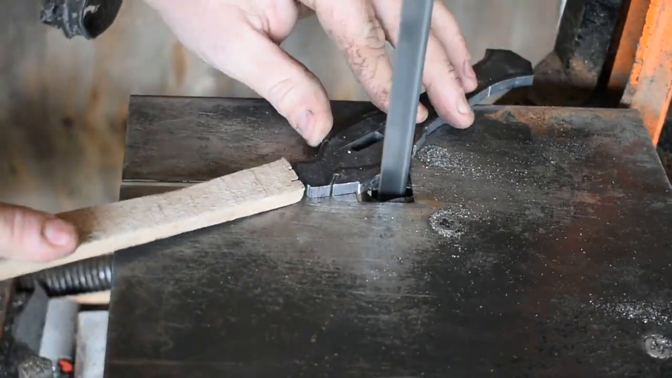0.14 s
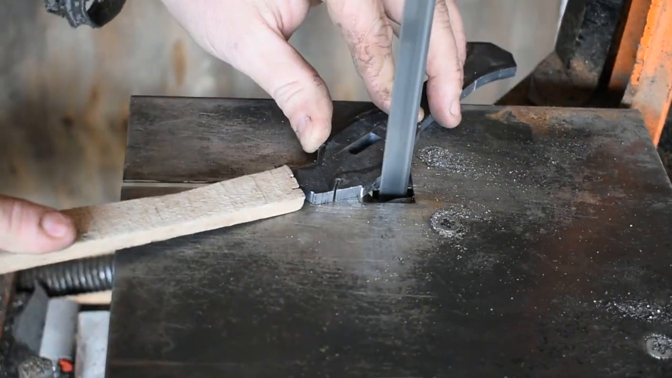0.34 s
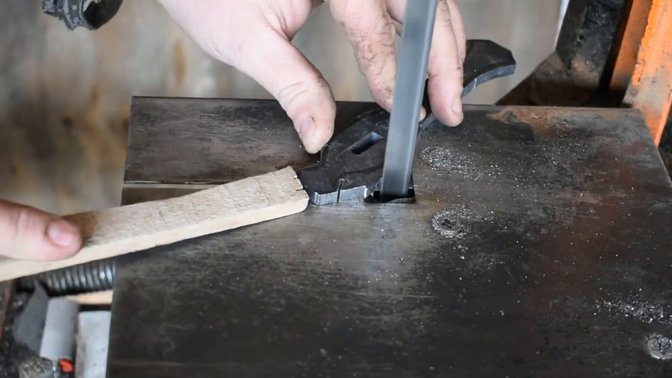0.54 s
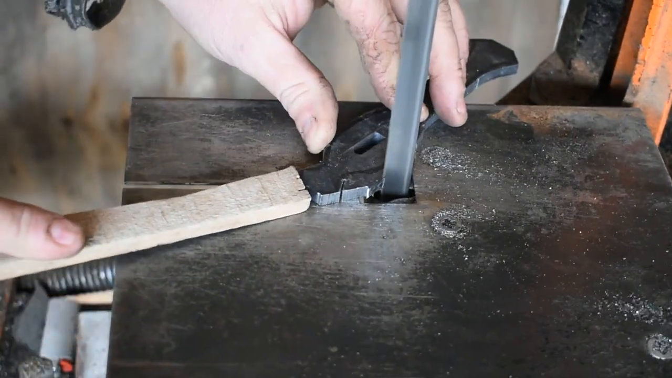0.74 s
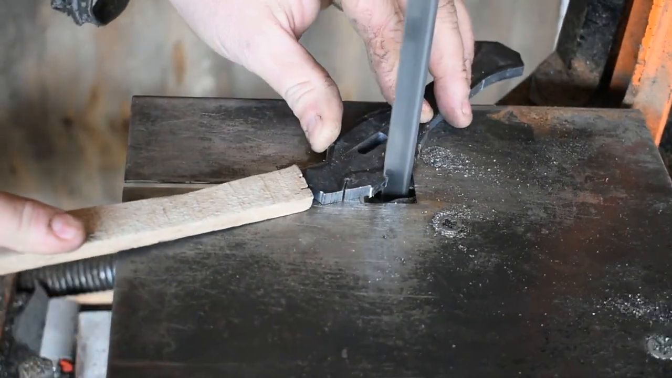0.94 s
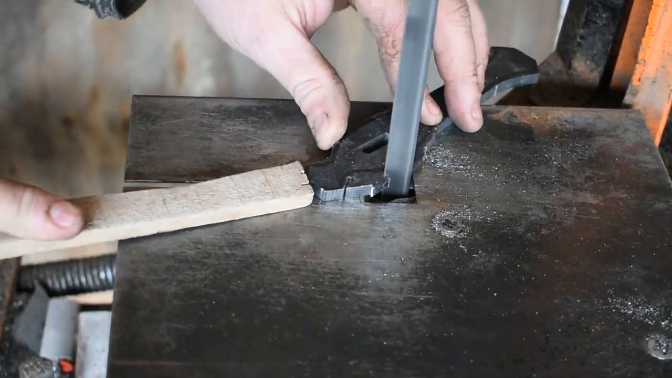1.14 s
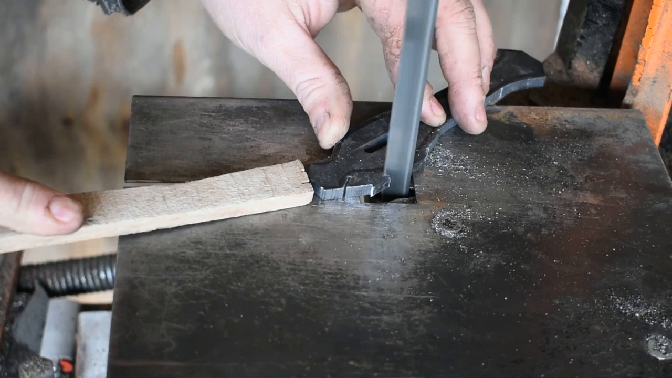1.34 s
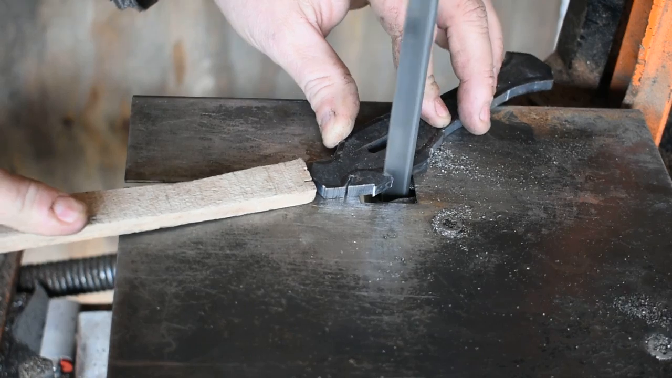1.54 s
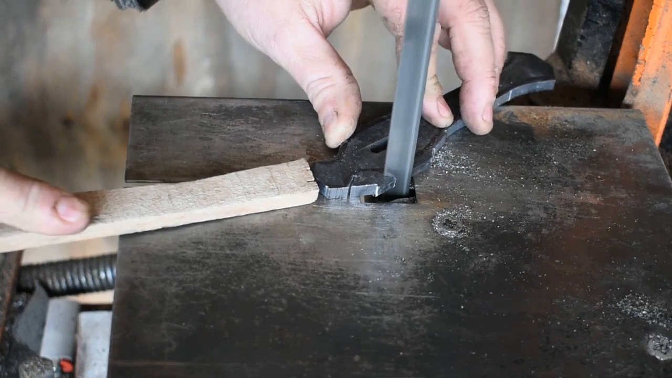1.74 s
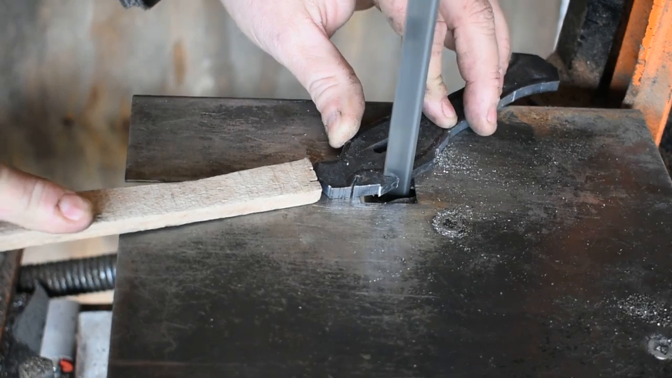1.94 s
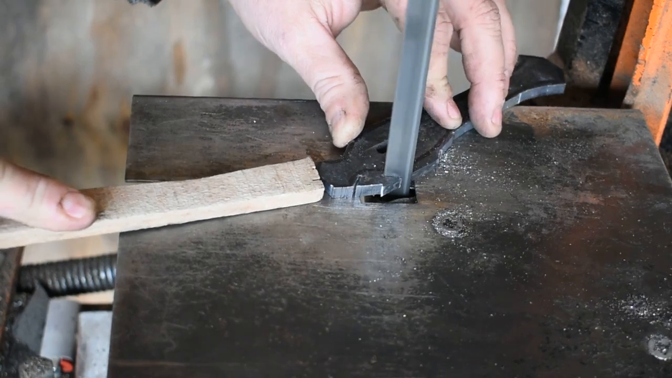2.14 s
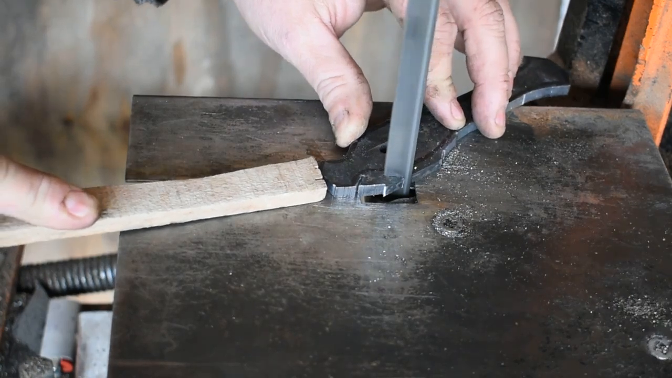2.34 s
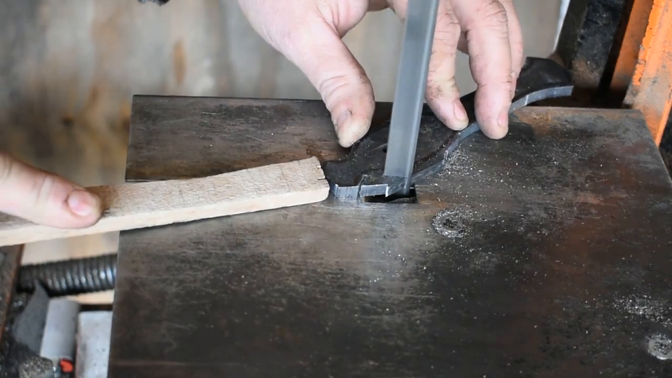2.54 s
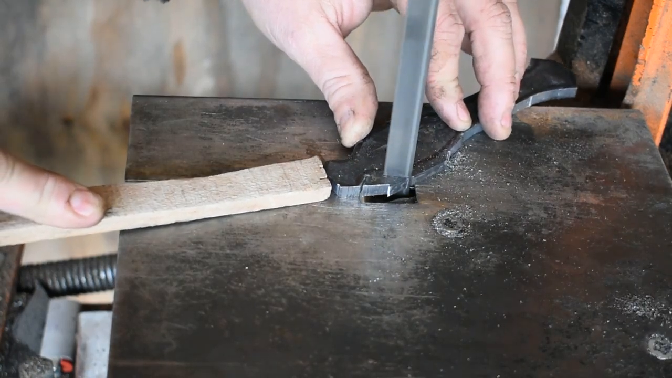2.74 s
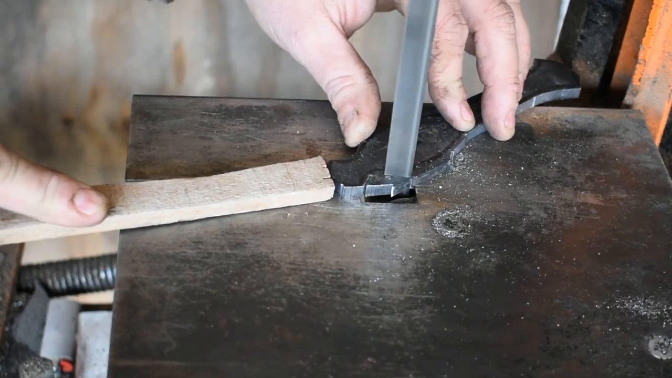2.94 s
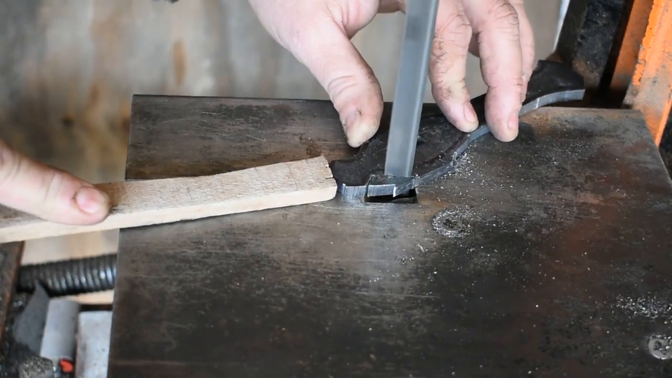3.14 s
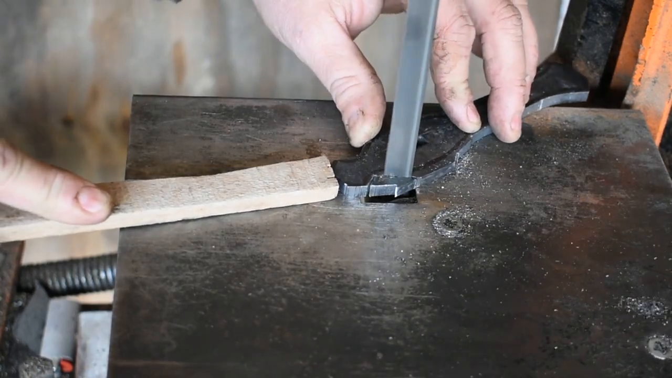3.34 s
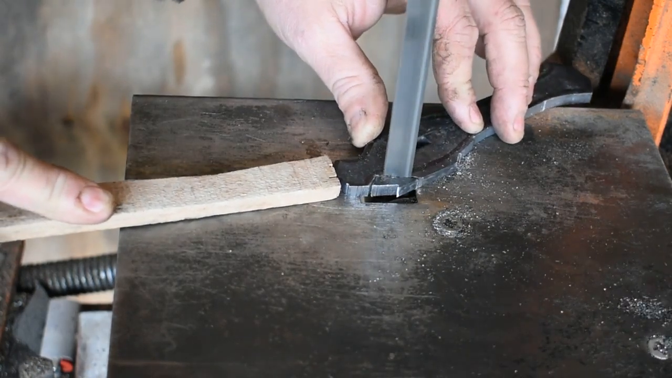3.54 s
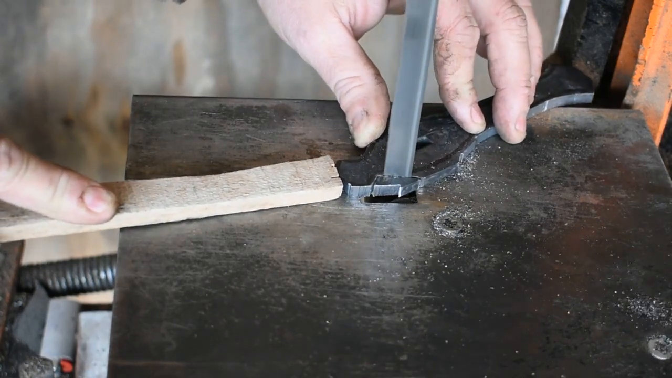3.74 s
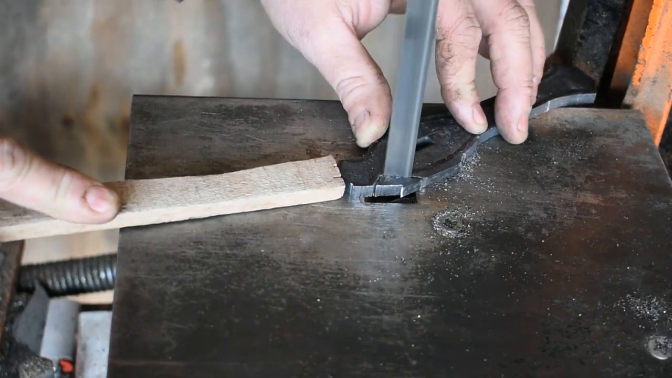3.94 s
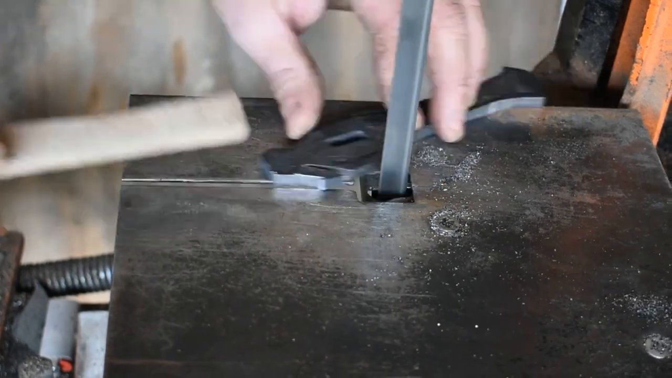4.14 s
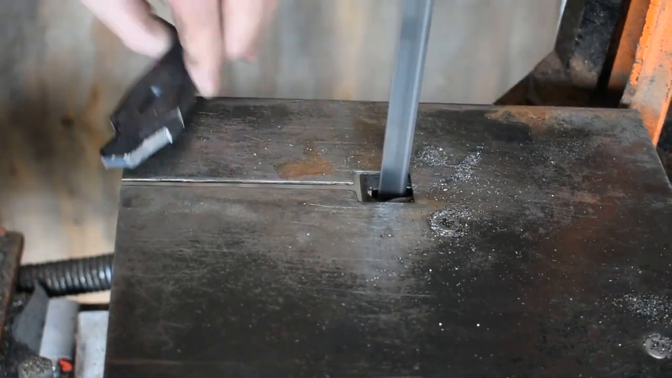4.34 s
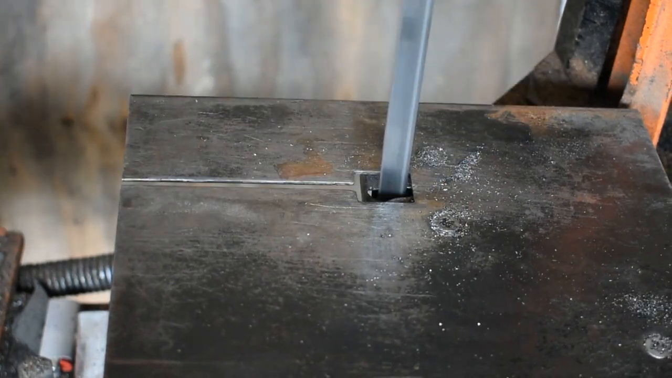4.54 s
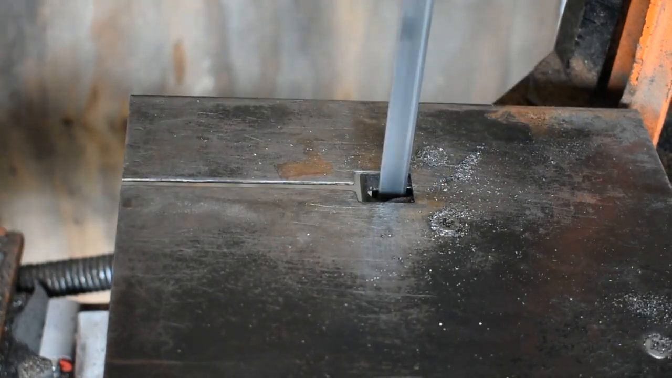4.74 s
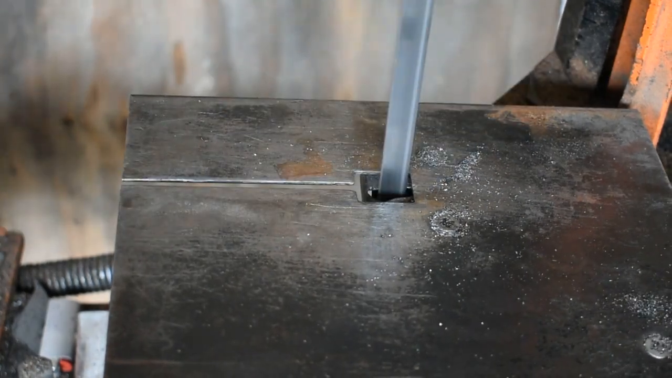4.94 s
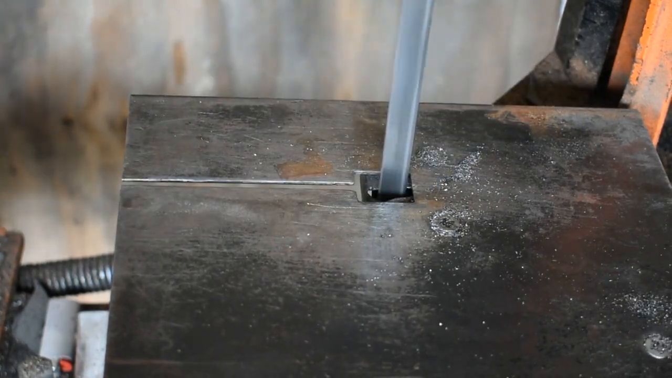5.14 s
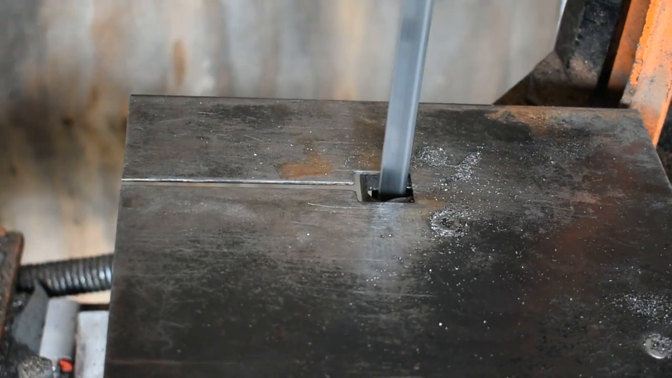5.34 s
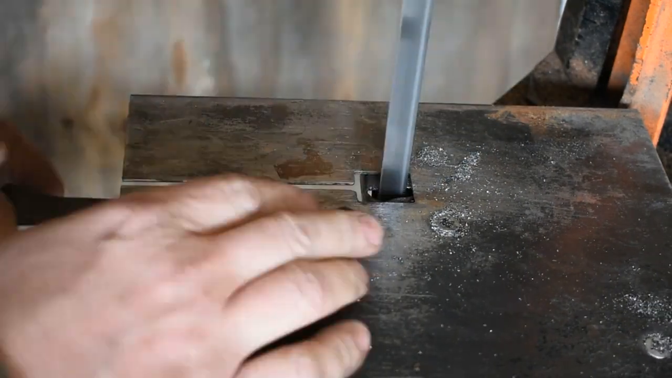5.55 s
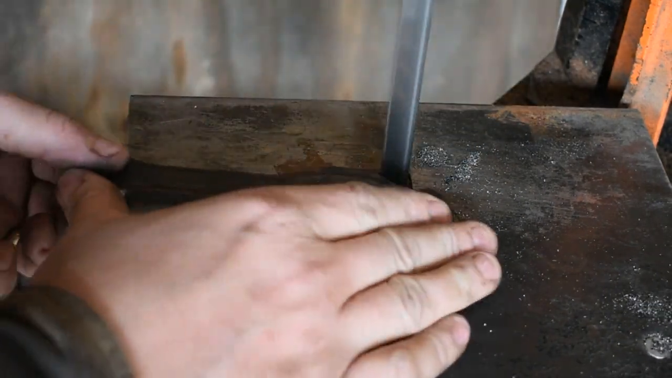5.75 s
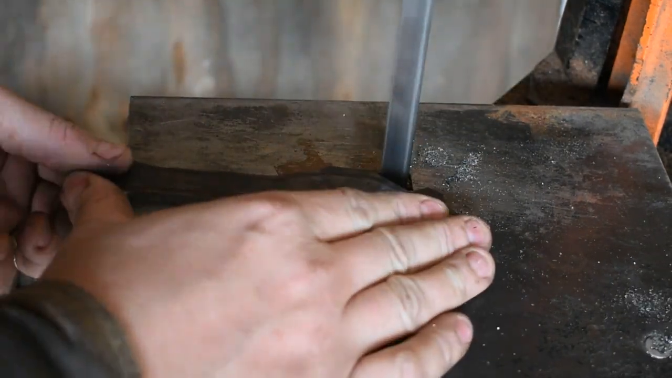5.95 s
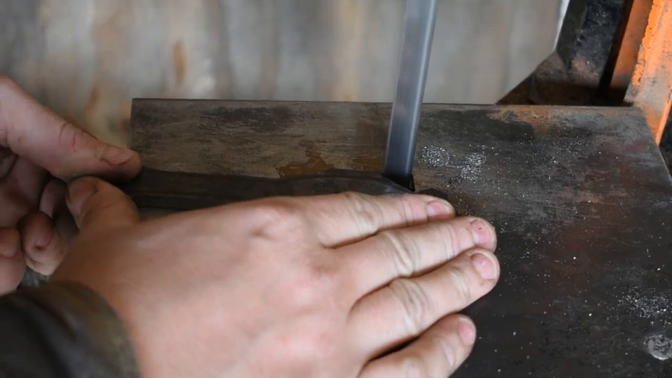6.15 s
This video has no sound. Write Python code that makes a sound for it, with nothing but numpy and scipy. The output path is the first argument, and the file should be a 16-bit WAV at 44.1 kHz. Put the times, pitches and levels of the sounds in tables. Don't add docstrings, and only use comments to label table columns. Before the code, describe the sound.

Dry, close mono sound, sped up and bright: saw teeth grind steel with a ringing rasp and two-toned squeal, briefly easing with every lap of the blade. Soft bumps come through the table. After four seconds the work knocks free and the saw idles with a steady whirr. Sharp metallic ticks and thuds follow, then rattling contact and a rougher second cut.

```python
import sys
import numpy as np
from scipy import signal
from scipy.fft import rfft, irfft
from scipy.io import wavfile
from scipy.ndimage import uniform_filter1d, minimum_filter1d

SR = 44100
rng = np.random.default_rng(int(sys.argv[2]) if len(sys.argv) > 2 else 0)


def store_pcm(level_fs):
    pcm = np.round(np.clip(level_fs, -1, 1) * 32767).astype(np.int16)
    wavfile.write(sys.argv[1], SR, np.atleast_2d(pcm).T)


def voltage_ratio(decibels):
    exponent = np.asarray(decibels, float) / 20
    return 10 ** exponent


N = 273420
T = np.arange(N) / SR
LAP_S = .4445
SQUEAL_HZ = 2038


def rms1(x):
    return x / np.sqrt(np.mean(np.abs(x) ** 2))


def curve(rows):
    s, *columns = np.transpose(rows)
    return [np.interp(T, s, c) for c in columns]


def walk(rate):
    steps = np.repeat(rng.standard_normal(int(N / SR * rate) + 2), 8)
    smooth = uniform_filter1d(uniform_filter1d(steps, size=8), size=8)
    return 1.3 * np.interp(T * rate * 8, np.arange(len(smooth)), smooth)


def humps(s, ms, height):
    grid = np.arange(0, N / SR, 1 / 1000)[:, None]
    shape = np.exp(-4 * np.log(2) * (1000 * (grid - s) / ms) ** 2)
    return np.interp(T, grid[:, 0], shape @ height)


def ring(x, hz, width, order=1):
    b, a = signal.iirpeak(hz, hz / width, SR)
    return signal.sosfilt([np.r_[b, a]] * order, x)


def waver(hz, width, steady):
    pole = [1, 1.5 * np.pi * width / SR - 1]
    flicker = signal.lfilter([1], np.convolve(pole, pole), rng.standard_normal((2, N)))
    flicker = steady + rms1(flicker[0] + 1j * flicker[1])
    turning = np.exp(2j * np.pi * np.cumsum(hz + 0 * T) / SR)
    return rms1(np.imag(flicker * turning))


def colour(x, points):
    hz, db = np.transpose(points)
    f = np.fft.rfftfreq(N, 1 / SR) + 1
    return irfft(rfft(x) * voltage_ratio(np.interp(np.log(f), np.log(hz), db, left=-120)), N)


def grit(spread_db, rate, flutter_db):
    size = np.minimum(rng.exponential(size=N // 16 + 1), 3)
    force_db = spread_db * np.repeat(size, 16)[:N] + flutter_db * walk(rate)
    return rms1(rng.standard_normal(N) * voltage_ratio(force_db))


def body(push, modes, spectrum, fill_db, wander_db, rate):
    rings = 0
    for f, w, db in modes:
        level = voltage_ratio(db + 1 - f / 3500 + wander_db * walk(rate))
        rings = rings + level * ring(push, f, (1.2 + f / 14000) * w, order=2)
    rings = signal.sosfilt(signal.butter(3, 600, "high", fs=SR, output="sos"), rings)
    sound = rings + voltage_ratio(fill_db) * colour(push * rng.choice([-1, 1], N), spectrum)
    return rms1(sound + signal.sosfiltfilt(signal.butter(5, 960, "high", fs=SR, output="sos"), sound))


# time in seconds, width in ms, change in dB.
LEVEL_SWINGS = [(.014, 22, 1), (.03, 12, -3), (.086, 14, -0.5), (.143, 14, 0.5), (.227, 10, -1.5),
                (.286, 8.9, 2), (.301, 14, -0.5), (.33, 23, 2.5), (.36, 16, -1), (.4, 24, 0.5), (.2, 30, 1.5),
                (.46, 13, 1), (.502, 12, -1), (.545, 14, -2), (.658, 14, -2.5), (.756, 16, -3), (.835, 12, -1),
                (.865, 28, 0), (.915, 8, -2.5), (.98, 14, -5), (1, 20, 3.5), (1.08, 13, -3.5), (1.16, 24, 0.5),
                (1.36, 30, 1), (1.426, 14, -2.5), (1.63, 15, 3), (1.868, 13, 1), (2.31, 18, -3),
                (2.515, 12, -2), (2.961, 14, 0.5), (3.411, 22, -4), (3.86, 28, -3.5), (3.9, 40, 0.5),
                (4.005, 8, -4), (4.085, 14, -5), (4.172, 19, -1), (4.33, 290, 2.5), (4.73, 30, 1),
                (4.907, 95, -2), (4.902, 23, -3.5), (5.438, 25, -6.5), (5.787, 11, 0), (5.85, 30, 5.5),
                (5.882, 13, -1.5), (5.905, 12, -3), (5.995, 26, 0), (6.009, 8, -1.5), (6.04, 45, 0),
                (6.17, 24, -2.5)]


def level_swings():
    return voltage_ratio(humps(*np.transpose(LEVEL_SWINGS)))


# first pass in seconds, width in ms, widening in ms per lap,
# dip in dB, shallower by dB per lap.
WORN = [
    (0.539, 22, 1.146, -1.5, 0),
    (0.743, 4.6, 3.7, -14.5, 3.5),
]
# start in seconds, end in seconds, level in dB.
CONTACT = [
    (-.1, 0.021, -26.5),
    (.14, 4.09, -27),
    (5.75, 5.84, -33),
    (5.79, 5.85, -29.5),
    (5.885, 6.4, -31.5),
    (5.95, 6.4, -32),
]


def bite():
    rise_s, release_s = 0.02, 0.11
    ramp = lambda s, length: np.clip(s / length, 0, 1) ** 2
    return sum(voltage_ratio(db) * ramp(T - a, rise_s) * ramp(b + release_s - T, release_s) for a, b, db in CONTACT)


def worn():
    lap = np.arange(9)
    dips = 0
    for s, ms, wider, db, fade in WORN:
        passes = s + LAP_S * lap
        depth = np.minimum(db + fade * lap, 0) * (passes < CONTACT[1][1])
        dips = dips + humps(passes, ms + wider * lap, depth)
    return dips


STAGE_S = [
    0,
    .55,
    2.15,
    5,
]
# frequency in Hz, width in Hz, level in dB.
ENTRY = [(1706, 71, -6), (2013, 49, 3.5), (3330, 88, 0), (3730, 290, -1.5), (4150, 75, -9), (4850, 170, 2),
         (5200, 53, -10), (5630, 63, -11), (6200, 170, -11), (7460, 96, -8), (8300, 69, -5),
         (9980, 120, -12.5), (10400, 95, -8), (11500, 43, -5), (11900, 62, -13), (13900, 70, -11),
         (14600, 65, -10), (15600, 55, -16)]
MIDDLE = [(1275, 26, -20.5), (1713, 65, -12), (2055, 27, -1), (2640, 150, -17.5), (2916, 32, -9.5),
          (3323, 120, -5.5), (4100, 190, 6.5), (4610, 69, -6), (4810, 31, -6), (5160, 72, -10),
          (5780, 72, -9), (5496, 38, -4), (5960, 136, -2.5), (6204, 130, -5.5), (6650, 72, -12),
          (6980, 80, -7.5), (7930, 150, -10), (9500, 41, -14), (10220, 280, -15.5), (11280, 380, -10.5),
          (11930, 27, -6), (12200, 43, -25.5), (12600, 79, -14), (13500, 60, -28), (13700, 170, -11.5),
          (15200, 280, -15)]
DEEP = [(1298, 7.5, -15.5), (1776, 53, -9.5), (2048, 33, -1), (2679, 150, -17.5), (2870, 16, -21),
        (3350, 60, -5), (3930, 270, -2.5), (4587, 115, -3.5), (4770, 166, -3.5), (5000, 28, -8.5),
        (5440, 54, -3.5), (6000, 390, -6), (6720, 87, -11), (6770, 31, -1), (7240, 120, -19),
        (7760, 180, -11), (8210, 260, -7), (9170, 52, -15.5), (10060, 90, -7.5), (11340, 84, -12.5),
        (11800, 65, -8.5), (13300, 650, -13.5), (15500, 240, -13)]
SECOND = [(1207, 160, -5.5), (1696, 63, -3.5), (2100, 38, -15), (3290, 210, -1.5), (3770, 150, -7),
          (4710, 160, 1), (4960, 180, -2.5), (5500, 130, -8.5), (6040, 260, -5), (7630, 160, -7.5),
          (8240, 160, -13), (10200, 320, -13), (10400, 200, -8), (12730, 200, -2.5), (13900, 240, -6.5),
          (14200, 38, -13), (15400, 120, -5)]
# frequency in Hz, level in dB per Hz.
ENTRY_TEAR = [(150, -61), (250, -29), (920, -14.5), (1400, -0.5), (1910, -40), (2080, -2.5), (2520, -4.5),
              (3390, 4), (4790, 4), (5610, -2), (11400, -4.5), (15900, -5)]
MIDDLE_TEAR = [(150, -69), (250, -51), (904, -28), (1260, -22), (1350, -61), (1720, -20), (1880, -41),
               (2010, -3.5), (2430, -26), (4030, 7), (4400, -11), (6110, -1.5), (8810, -8.5), (11400, -12),
               (15900, -32)]
DEEP_TEAR = [(150, -64), (250, -60), (815, -66), (1600, -13), (1750, -6.5), (1910, -27), (2080, 2.5),
             (2390, -10.5), (4030, 4), (4400, -12.5), (6110, 3), (8220, -2), (9120, -12.5), (9950, -4.5),
             (15900, -21)]
SECOND_TEAR = [(150, -65), (250, -30), (904, -36), (1240, -25), (1500, -34), (1720, -20), (2390, -9),
               (3270, -6), (4710, 0.5), (9120, -5.5), (12700, -6), (15900, -7)]


def cut():
    push = grit(spread_db=3.0, rate=110, flutter_db=0.91)
    stages = [(ENTRY, ENTRY_TEAR), (MIDDLE, MIDDLE_TEAR), (DEEP, DEEP_TEAR), (SECOND, SECOND_TEAR)]
    begun = [np.clip((T - s) / .4 + (.5 if s else 1), 0, 1) for s in STAGE_S] + [0]
    sound = 0
    for k, (modes, tear) in enumerate(stages):
        free = []
        for f, w, db in modes:
            near_squeal = abs(f / SQUEAL_HZ - round(f / SQUEAL_HZ)) < .07 and f < 4200
            free.append((f, w, db - 9 * near_squeal))
        share = np.sqrt(begun[k] - begun[k + 1])
        sound = sound + share * body(push, free, tear, fill_db=-12, wander_db=2.2, rate=16)
    first_piece = T < STAGE_S[3]
    web = np.clip((T - 3.16) / 0.39, 0, 1) * first_piece
    sound = sound + web * (0.94 * ring(sound, 15500, 2600) - 0.72 * ring(sound, 5900, 840))
    lost = .6 * (begun[1] - begun[3]) * np.clip(2.3 - T / 2, .4, 1)
    sound = sound - lost * ring(sound, 4030, 450)
    sound = sound - 0.5 * np.clip(T - 1.0, 0, 1) * (1 - begun[3]) * ring(sound, 2760, 790)
    through = np.clip((T - 3.5) / 0.054, 0, 1) * first_piece
    sound = sound + through * (0.97 * ring(sound, 5200, 620) - 0.34 * ring(sound, 6200, 1900))
    sound = sound * voltage_ratio(1 * begun[3] * walk(55))
    sound = sound - np.clip((T - 6.07) / 0.042, 0, 1) * ring(sound, 1130, 1400)
    return bite() * sound


# time in seconds, load from 0 to 1.
LOAD = [
    (.3, 0.15),
    (.62, 0.5),
    (4.05, 0.53),
    (4.25, 0.15),
    (5.78, 0.03),
    (5.86, 0),
    (6.1, 0.6),
]


def work_load():
    return curve(LOAD)[0]


# frequency in Hz, width in Hz, level in dB.
FRAME = [(662, 61, -15.5), (1256, 23, -6), (1538, 41, -5.5), (1780, 38, -3), (1854, 18, -6),
         (2170, 66, -18), (2628, 88, -7.5), (3104, 70, -2), (3600, 20, 0), (3776, 100, -5.5),
         (4110, 35, -16), (4740, 57, 0.5), (4830, 87, 1.5), (5180, 44, -9), (5460, 27, -23),
         (6270, 83, -9.5), (6830, 220, -9), (7080, 69, -8), (8223, 99, -7), (10000, 41, -22),
         (10060, 130, -13.5), (11080, 190, -7), (11470, 33, -7), (13100, 250, -9.5), (13900, 60, -2),
         (13900, 190, -11), (15600, 180, -44)]
# frequency in Hz, level in dB per Hz.
WHIRR = [(150, -60), (250, -27), (459, -57), (501, -15.5), (760, -18), (986, -7), (1520, -4.5),
         (2850, -15.5), (3160, -1.5), (4170, -9.5), (4710, -4.5), (5910, -12), (8220, -8.5), (14300, -17),
         (15900, -3.5)]
# multiple of the motor frequency, level in dB.
MOTOR_ORDERS = [(0.359, -15), (1, 1.5), (1.35, -1), (2, 11), (2.997, 13)]


def idle():
    motor_hz = 504.5
    push = grit(spread_db=1.5, rate=60, flutter_db=.7)
    whirr = body(push, FRAME, WHIRR, fill_db=-5.5, wander_db=2.4, rate=18)
    hum = sum(voltage_ratio(db) * waver(k * motor_hz, width=10 * k, steady=1.8 / k) for k, db in MOTOR_ORDERS)
    load = work_load()
    return whirr * voltage_ratio(-32 - 9.5 * load) + hum * voltage_ratio(-65.5 - 24 * load)


# time in seconds, peak in dB.
KNOCK = [(0.0991, -21.5), (0.117, -22.5), (1.165, -35), (2.991, -25), (4.1226, -19.5), (4.2535, -25),
         (4.633, -27), (4.735, -28), (4.876, -29), (5.2663, -23), (5.566, -14.5), (5.7673, -20),
         (5.795, -18), (5.803, -20), (5.895, -24.5), (5.917, -21), (5.931, -30), (5.987, -21), (6.019, -24),
         (6.035, -27), (6.06, -37), (6.1, -26)]
# frequency in Hz, width in Hz, level in dB.
PIECE = [(2420, 52, 2), (3700, 320, 8.5), (5330, 1100, -0.5), (6100, 180, -6), (7540, 1400, -3.5),
         (9970, 360, 2.5), (12600, 1300, -3)]
# time in seconds, level in dB.
THUD = [
    (4.1234, -40),
    (4.2554, -60),
    (4.7943, -35),
    (4.876, -42),
    (5.302, -39),
    (5.564, -38),
    (5.799, -52),
]


def knocks():
    t60_s = 0.047
    force, thud = np.zeros(N), np.zeros(N)
    for s, db in KNOCK:
        i = int(s * SR)
        after = T[:min(N - i, 4000)]
        decay = np.exp(-np.log(1000) * after / t60_s)
        force[i:i + len(after)] += voltage_ratio(db) * decay * np.minimum(after / .001, 1)
    for s, db in THUD:
        thud[int(s * SR)] += voltage_ratio(db)
    push = rng.standard_normal(N) * force
    rattle = sum(voltage_ratio(db) * ring(push, f, w) for f, w, db in PIECE)
    return voltage_ratio(1.5) * rattle + voltage_ratio(-46.0) * push + voltage_ratio(21.0) * ring(thud, 178, 540)


# time in seconds, low line in dB, high line in Hz, high line in dB.
SQUEAL = [(.14, -44, 3920, -48.5), (.37, -43, 4110, -34), (.48, -43, 4110, -34), (.57, -48, 4110, -27.5),
          (.75, -51, 4080, -29), (1.08, -42.5, 4110, -27), (1.3, -41, 4120, -30), (1.7, -39.5, 4070, -30),
          (2.2, -42, 4110, -31), (2.6, -36.5, 4155, -31), (2.85, -38, 4120, -37), (3.3, -38, 4120, -35),
          (3.55, -38.5, 4150, -36.5), (3.77, -40, 4150, -41.5), (3.95, -33, 4150, -37),
          (4.14, -42, 4150, -35.5)]
# time in seconds, low line in dB.
SQUEAL_AGAIN = [
    (5.95, -50),
    (6.08, -49),
    (6.2, -40),
]


def squeal():
    low_db, high_hz, high_db = curve(SQUEAL)
    break_db, break_ms = -15, 55
    first, second = WORN[0][0], WORN[1][0]
    lap = (T - second) / LAP_S % 1 - .5

    def near(s):
        away_s = (((T - s) / LAP_S + .5) % 1 - .5) * LAP_S
        return np.exp(-(away_s * 2000 / break_ms) ** 2)

    broken = break_db * (near(second) + .7 * np.clip(1.7 - T / 2, .15, 1) * near(first))
    low_db = low_db + 5.5 * lap + 0.77 * broken
    high_db = high_db + broken
    high_hz = high_hz + 19 * lap
    cutting = np.clip((T - SQUEAL[0][0]) * 50, 0, 1) * np.clip((SQUEAL[-1][0] - T) * 50, 0, 1)
    low = waver(SQUEAL_HZ + 6 * walk(9), width=26, steady=1.1)
    high = waver(high_hz + 30 * walk(50), width=105, steady=.85) * voltage_ratio(1.2 * walk(25))
    partner = waver(3935 + 30 * walk(60), width=110, steady=.6) * voltage_ratio(2 * walk(20))
    high = high + np.clip((T - 1.25) / .3, 0, .9) * partner
    upper = waver(2.0 * high_hz + 50 * walk(6.1), width=85, steady=0.29)
    long_cut = cutting * (voltage_ratio(low_db) * low + voltage_ratio(high_db - 1.5) * (high + voltage_ratio(-36) * upper))
    return long_cut + voltage_ratio(curve(SQUEAL_AGAIN)[0]) * (T > CONTACT[4][0]) * low


# time in seconds, level in dB, length in ms.
BUMP = [(0.372, -38, 18), (0.731, -44.5, 19.6), (1.109, -32.5, 52), (0.967, -49, 14), (1.413, -36, 5.8),
        (0.83, -54, 69), (1.66, -45, 19.4), (1.94, -50, 40), (2.11, -56, 30.7), (2.285, -55, 25),
        (2.41, -62, 31), (2.65, -47, 22.5), (2.739, -46, 16), (3.009, -34.5, 68), (3.16, -39, 49),
        (3.57, -46, 24), (3.637, -43, 12), (3.77, -49, 22), (3.98, -42.5, 31), (4.389, -47, 24),
        (4.48, -49, 45), (5.08, -47, 27), (5.445, -45, 64), (6.11, -43, 23)]


def bumps():
    noise = rng.standard_normal(N)
    s, db, ms = np.transpose(BUMP)
    bump_hz = 337
    puffs = humps(s, ms, voltage_ratio(db)) * rms1(ring(noise, bump_hz, 1.53 * bump_hz, order=2))
    taps = (rng.random(N) < 55 / SR) * rng.standard_normal(N) + .013 * noise
    load = work_load()
    loose = load * np.clip((T - 2.05) / 1.2, 0, 1) + 0.11 * (T > STAGE_S[3]) * load
    stand_db = -76 + 30 * loose - 5.9 * (2 - load)
    return voltage_ratio(-17.5) * puffs + voltage_ratio(stand_db) * rms1(ring(taps, 90, 420))


# first pass in seconds, length in ms, level in dB, change in dB per
SCRAPE = [
    (.727, 13, -29, -1),
    (.775, 42, -33, 0.5),
    (0.97, 12, -28.5, -0.5),
]
# frequency in Hz, level in dB per Hz.
SCRAPE_TONE = [(700, -23), (1300, -9), (2500, -5.5), (3300, -1), (5000, -1.5), (8000, -22), (15900, -39)]
# frequency in Hz, width in Hz, start in seconds, fade in seconds, level in dB.
LAST_RING = (5580, 160, 4.2, .2, -43)


def scrape():
    lap = np.arange(8)
    rasp = sum(humps(s + LAP_S * lap, ms + 0 * lap, voltage_ratio(db + fade * lap)) for s, ms, db, fade in SCRAPE)
    hz, width, start, fade, db = LAST_RING
    slide = np.clip((T - start) * 40, 0, 1) * np.exp(-np.maximum(T - start, 0) / fade)
    rough = rms1(colour(rng.standard_normal(N), SCRAPE_TONE))
    return rasp * rough + voltage_ratio(db) * slide * waver(hz, width, steady=0.39)


# time in seconds, peak in dB.
TICK = [
    (4.6154, -23.5),
    (4.652, -36),
    (4.7968, -17),
    (4.878, -21),
    (5.2677, -16),
    (5.3016, -21),
    (5.303, -27),
    (5.897, -23),
    (6.003, -22),
]


def ticks():
    t60_s = 0.011
    force = np.zeros(N)
    for s, db in TICK:
        i = int(s * SR)
        force[i:i + 1500] += voltage_ratio(db) * np.exp(-np.log(1000) * T[:1500] / t60_s)
    push = rng.standard_normal(N) * force
    return ring(push, 11400, 8700) + voltage_ratio(-5.0) * ring(push, 2600, 4100)


# time in seconds, frequency in Hz, level in dB, t60 in seconds.
PING = [
    (4.615, 10100, -27, 0.023),
    (4.616, 13700, -36, .015),
    (4.656, 10200, -33, .025),
    (4.799, 10050, -35, 0.1),
    (4.799, 11700, -41, .08),
    (4.874, 11900, -38, .02),
    (4.879, 8340, -34, 0.13),
    (4.881, 9530, -34, 0.11),
    (4.735, 1566, -35, 0.14),
    (4.737, 3060, -35, .05),
]


def pings():
    after = lambda s: np.maximum(T - s, 0)
    return sum(voltage_ratio(db - 60 * after(s) / t60) * np.sin(2 * np.pi * hz * after(s)) for s, hz, db, t60 in PING)


def scene():
    saw = level_swings() * (voltage_ratio(worn()) * (cut() + squeal()) + idle())
    mono = saw + knocks() + bumps() + scrape() + ticks() + pings()
    return np.array([mono, mono])


# time in seconds, width in ms, treble valleys in dB.
THIN = [(0.34, 20, -9), (0.711, 12, -12), (0.839, 12, -10), (0.887, 14, -10), (0.943, 13, -11),
        (1.014, 29, -26), (1.839, 15, -12), (1.919, 10, -11), (2.072, 21, -11), (2.754, 18, -10),
        (2.955, 14, -9), (3.091, 18, -15), (3.744, 14, -15), (4.168, 19, -8), (4.348, 16, -11),
        (4.531, 18, -9), (4.822, 18, -9), (4.856, 17, -10), (4.905, 26, -9), (5.114, 16, -11),
        (5.174, 28, -19), (5.256, 13, -21), (5.418, 15, -14), (5.473, 12, -10), (5.535, 14, -19),
        (5.849, 29, -30)]


def speed_up_thinning(x):
    f, t, z = signal.stft(x, SR, nperseg=1024, noverlap=896)
    size = uniform_filter1d(np.abs(z), size=13, axis=1)
    tops = lambda bins: size >= -minimum_filter1d(-size, size=bins, axis=0)
    tallest = np.where(f[:, None] < 6800, tops(bins=11), tops(bins=35))
    keep = -minimum_filter1d(-1. * tallest, size=3, axis=0)
    partials = voltage_ratio(3) * signal.istft(z * keep, SR, nperseg=1024, noverlap=896)[1][:N]
    s, ms, treble_db = np.transpose(THIN)
    gap = x - partials
    gap_low = signal.sosfiltfilt(signal.butter(4, 7300, "low", fs=SR, output="sos"), gap)
    low_gain = voltage_ratio(humps(s, ms, 1.5 * .72 * treble_db))
    high_gain = voltage_ratio(humps(s, ms, 1.5 * treble_db))
    out = partials + low_gain * gap_low + high_gain * (gap - gap_low)
    bass = signal.sosfiltfilt(signal.butter(4, 1300, "low", fs=SR, output="sos"), out)
    bass_gain = voltage_ratio(humps(s, ms, 1.4 * np.minimum(treble_db + 9, 0)))
    return out + (bass_gain - 1) * bass


def band_limit(x):
    return signal.sosfilt(signal.butter(12, 17020, fs=SR, output="sos"), x)


def record(dry):
    limit = .3
    x = limit * np.tanh(1.095 * dry[0] / limit)
    out = speed_up_thinning(x)
    out = signal.sosfilt(signal.ellip(10, .2, 44, 15800, fs=SR, output="sos"), out)
    return band_limit(np.array([out, out]))


dry = scene()
out = record(dry)
store_pcm(out)
```